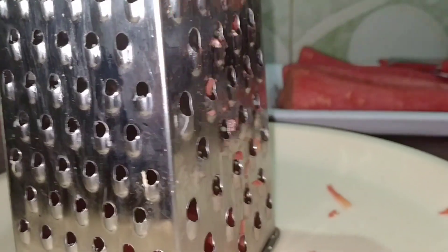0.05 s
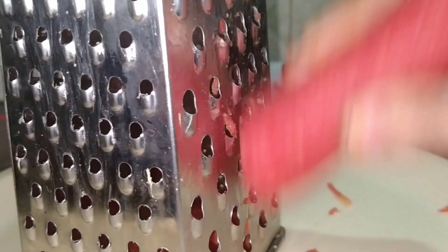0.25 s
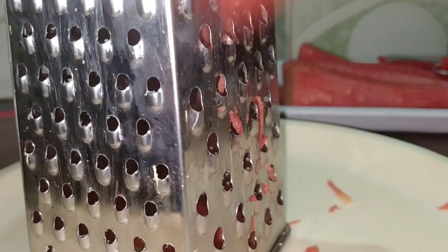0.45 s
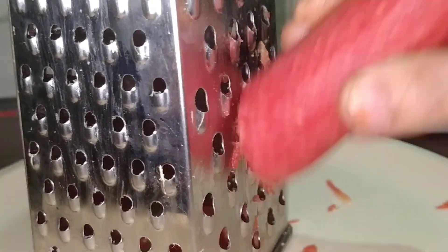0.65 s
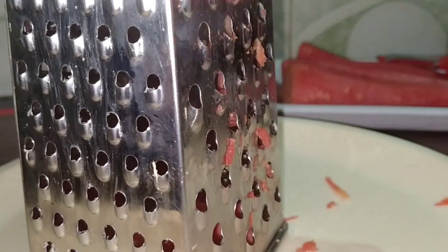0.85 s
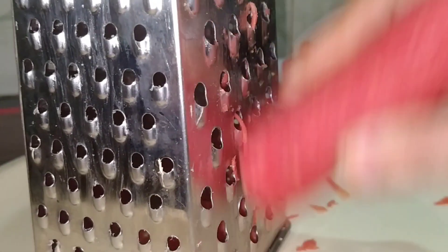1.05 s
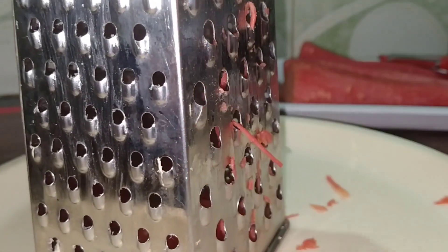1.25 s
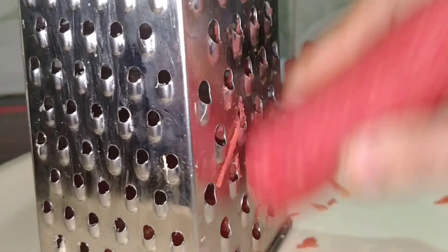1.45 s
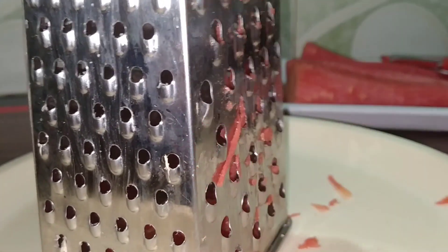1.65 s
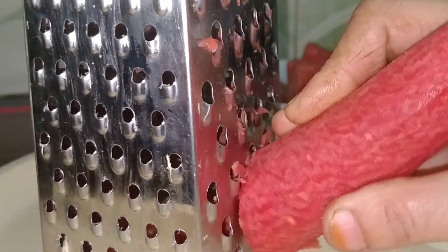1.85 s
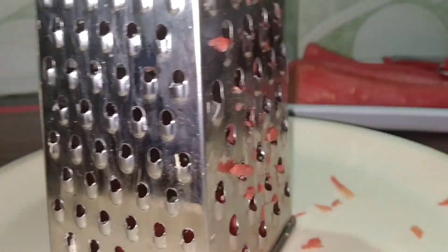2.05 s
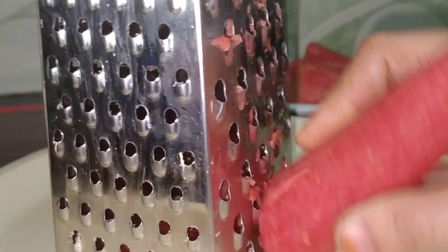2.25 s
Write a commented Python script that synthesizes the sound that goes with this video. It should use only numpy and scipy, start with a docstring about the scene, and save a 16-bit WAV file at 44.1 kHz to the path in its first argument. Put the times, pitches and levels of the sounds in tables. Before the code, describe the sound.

Carrot grated on a metal box grater in six brisk, crunchy strokes, close up in a kitchen

```python
"""A carrot is grated in six even downstrokes on the coarse side of a steel box grater, close by in a kitchen.
First, over faint room tone, it brushes the teeth on its way back up: short swells of scraping noise.
Each stroke lands with a soft knock and a wet hiss, both filtered noise, then swells into a dense crunch:
random fibre snaps, rubbing and catching teeth drive the ringing modes and dense wash of the thin steel.
After some pushes the box thumps on its plate in low decaying sines, once with a longer hum; brushes follow."""
import sys
import numpy as np
from scipy import signal
from scipy.fft import rfft, irfft
from scipy.io import wavfile

SR = 44100
rng = np.random.default_rng(int(sys.argv[2]) if len(sys.argv) > 2 else 0)


def pcm_store(signal):
    """Save signal as 16-bit PCM."""
    levels = np.round(np.clip(np.atleast_2d(signal), -1, 1) * 32767)
    wavfile.write(sys.argv[1], SR, levels.astype(np.int16).T)


N = 101429
T = np.arange(N) / SR

# Room tone colour. Each row: frequency in Hz, relative level in dB.
AIR_COLOUR = [(40, -10.5), (100, 8.5), (300, -8), (700, -9.5), (2000, -14), (5800, -9.5), (7200, -33.5)]
AIR_DB = -72
# Light brushes on the way back up. Each row: start in seconds, length in seconds, level in dB.
BRUSHES = [(0, .08, -54), (0.405, 0.039, -44.5), (0.533, .04, -65), (0.812, 0.051, -66),
           (0.83, 0.04, -57.5), (0.954, .008, -66), (1.249, 0.034, -40.5), (1.638, 0.041, -40.5),
           (1.812, .018, -64.5), (2.104, 0.038, -45)]
BRUSH_FADE_S, CONTACT_RISE_S = 0.01, 0.0028  # the rise also serves the knocks
# A tooth catches and lets go, pinging the steel. Each row: start in seconds, crack level in dB, ping level in dB.
CATCHES = [(0.0249, -38.5, -38.5), (0.297, -21, -21.5), (.311, -30, -27.5), (0.363, -24.5, -33),
           (0.435, -59, -42), (.452, -43.5, -48.5), (.506, -58, -70.5), (0.682, -23.5, -25.5),
           (0.726, -31.5, -31.5), (0.964, -59, -73), (1.079, -30, -24), (1.122, -27.5, -23.5),
           (1.158, -26, -23), (1.25, -42.5, -42), (1.277, -50.5, -42.5), (1.51, -36.5, -22),
           (1.542, -32.5, -22), (1.561, -26, -20), (1.653, -41, -38), (1.959, -30, -22.5),
           (2.114, -47, -37)]
CRACK_FADE_S, PING_RISE_S = 0.0016, 0.0041
PING_LEVEL_SPAN_S = 0.013  # opening span over which a ping's level counts
# Carrot landing on the steel. Each row: start in seconds, rise in seconds, scrape level in dB, wet hiss level in dB.
LANDINGS = [(.193, 0.0055, -43.5, -46), (.586, .012, -51, -37), (0.994, 0.0076, -32.5, -44),
            (1.401, 0.012, -38.5, -50.5), (1.832, 0.005, -29, -40), (2.238, 0.0065, -50, -55.5)]
LAND_HOLD_S, LAND_FADE_S = 0.0068, 0.013
# Downstrokes. Each row: bite in seconds, fastest moment in seconds, end in seconds, level in dB.
STROKES = [(0.239, 0.319, 0.3678, -19.5), (0.607, 0.693, .748, -21.5), (1.03, 1.129, 1.197, -21.5),
           (1.453, 1.53, 1.597, -21.5), (1.873, 1.956, 2.044, -22.5), (2.29, 2.41, 2.44, -22.5)]
EDGE_DROP_DB, SWELL_POWER = 7.5, 1.93  # drop at bite and end, shape of the swell
BITE_S, LIFT_S = 0.012, 0.028  # time constants: digging in before the bite, letting go after the end
# Colour of the crunch. Each row: frequency in Hz, relative level in dB.
CRUNCH_COLOUR = [(55, -29.5), (100, -13.5), (200, -6.5), (350, 2.5), (500, -3), (750, 3), (1000, 2),
                 (1550, 7.5), (2100, 2), (2950, -1), (3800, -1), (4550, 1.5), (5000, -0.5), (5450, 5),
                 (6050, 2.5), (6500, -9.5), (7000, -28.5), (7600, -41)]
FIBRES_PER_S, FIBRE_SPREAD_DB, FIBRE_DB, RUB_DB = 2600, 2, -3, -9
TEETH_PER_S, TEETH_SPREAD_DB = 170, 1.26  # the load flickers as teeth bite
# Modes of the steel box. Each row: frequency in Hz, relative level in dB, T60 in seconds.
STEEL_MODES = [(298, -18, .08), (368, -21, .08), (635, -12, .11), (797, -19, .1), (1012, -17, .1),
               (1168, -18, .09), (1283, -18, .1), (1482, -6, .08), (1545, -10, .06), (1686, 0, .08),
               (1750, -4, .06), (1818, -13, .06), (2048, -19, .07), (2525, -20, .07), (2682, -19, .07),
               (2805, -20, .07), (3266, -17, .07), (3376, -19, .08), (4410, -16, .07), (4657, -12, .07),
               (5416, -16, .06), (5716, -15, .06), (5794, -15, .06)]
RING_DB, WASH_DB, WASH_T60_S = -5.5, -4, 0.04  # listed modes; dense wash of all the others
WASH_SHIFTS_PER_S = 14  # the moving carrot damps ever different parts of the wall
# Dull knocks of flesh on the wall. Each row: start in seconds, level in dB.
KNOCKS = [(0.191, -41), (.568, -54.5), (0.985, -41.5), (1.397, -62.5), (1.831, -40.5), (2.237, -49.5)]
KNOCK_FADE_S = 0.0054
# Colour of a knock. Each row: frequency in Hz, relative level in dB.
FLESH_COLOUR = [(60, -22), (130, -25), (280, 8), (450, -16), (700, -2), (900, -12.5), (1200, -18.5),
                (2600, -28.5), (3550, -20.5), (4400, -40), (7500, -50.5)]
# Hiss bands of the wet face sliding. Each row: centre in Hz, nominal width in Hz, relative level in dB.
SKIN_BANDS = [(3340, 100, -8.5), (5670, 310, 0.5)]
SKIN_FADE_S = 0.037
# The box thumps on its plate. Each row: start in seconds, pitch in Hz, level in dB.
THUMPS = [(0.369, 194, -29.5), (.378, 116, -48), (.405, 136, -42), (.405, 277, -37), (.43, 338, -41),
          (1.19, 188.6, -39.5), (1.205, 105, -47), (1.275, 360, -44), (1.598, 186.7, -37),
          (1.615, 123, -47), (1.645, 145, -42), (1.672, 334.6, -39.5), (1.68, 134, -43)]
THUMP_T60_S, THUMP_RISE_S = 0.12, 0.002
THUMP_ROUGHNESS = 0.45  # share of rattle in the rocking
# The lifted box hums on. Each row: start in seconds, pitch in Hz, level in dB.
HUMS = [(1.285, 298, -49.5)]
HUM_T60_S = 0.28
ROOM_T60_S, ROOM_DB = 0.22, -31
BASS_CUT_HZ, TOP_HZ = 85, 7400


def amp(db):
    """Decibels to gain."""
    return 10 ** (np.asarray(db) / 20)


def unit(x):
    """Scale to rms 1."""
    return x / np.sqrt(np.mean(x ** 2))


def through(x, response):
    """Pass a sound through an impulse response."""
    return signal.fftconvolve(x, response)[:N]


def colour(x, points):
    """Minimum-phase filter through (Hz, dB) points that keeps the power of white noise."""
    points_hz, points_db = np.array(points, float).T
    size = 4096
    bins_hz = np.arange(size // 2 + 1) * SR / size
    gain = unit(amp(np.interp(np.log(bins_hz + 1), np.log(points_hz), points_db)))
    # folding the cepstrum makes the response causal
    cepstrum = irfft(np.log(gain))
    cepstrum[1:size // 2] *= 2
    cepstrum[size // 2 + 1:] = 0
    return through(x, irfft(np.exp(rfft(cepstrum))))


def fade(t60_s):
    """Exponential decay of unit energy."""
    shape = np.exp(-np.log(1000) * T / t60_s)
    return shape / np.linalg.norm(shape)


def burst(start_s, rise_s, hold_s, release_s):
    """Linear attack, hold counted from the start, exponential release by time constant."""
    attack = np.clip((T - start_s) / rise_s, 0, 1)
    return attack * np.exp(-np.maximum(T - start_s - hold_s, 0) / release_s)


def walk(knots_per_s):
    """Random wander in straight lines between knots, rms 1."""
    knots = rng.standard_normal(N // 20)
    return unit(np.interp(T * knots_per_s, np.arange(len(knots)), knots))


def room_tone():
    """Steady coloured noise of the kitchen air."""
    return amp(AIR_DB) * colour(rng.standard_normal(N), AIR_COLOUR)


def effort():
    """How hard the carrot works the teeth: return brushes, landings and downstrokes, summed in power."""
    parts = [amp(db) * burst(start, CONTACT_RISE_S, length, BRUSH_FADE_S) for start, length, db in BRUSHES]
    for start, rise, scrape_db, _ in LANDINGS:
        parts.append(amp(scrape_db) * burst(start, rise, rise + LAND_HOLD_S, LAND_FADE_S))
    for bite, fastest, end, db in STROKES:
        before = (fastest - T) / (fastest - bite)
        after = (T - fastest) / (end - fastest)
        away = np.where(T < fastest, before, after)  # 0 when fastest, 1 at bite and end
        contact = np.exp(-np.maximum(bite - T, 0) / BITE_S - np.maximum(T - end, 0) / LIFT_S)
        parts.append(amp(db - EDGE_DROP_DB * away ** SWELL_POWER) * contact)
    return np.linalg.norm(parts, axis=0)


def grating_force():
    """Randomly timed fibre snaps plus rubbing noise, scaled by effort and the flickering load."""
    snap_now = rng.random(N) < FIBRES_PER_S / SR
    strength_db = FIBRE_SPREAD_DB * np.minimum(rng.exponential(size=N), 3)
    snaps = snap_now * rng.choice([-1, 1], N) * amp(strength_db)
    force = amp(FIBRE_DB) * unit(snaps) + amp(RUB_DB) * rng.standard_normal(N)
    flicker = unit(amp(TEETH_SPREAD_DB * walk(TEETH_PER_S)))
    return force * effort() * flicker


def steel_ring():
    """The box's modes after one tap, unit energy; neighbours swing in opposite directions."""
    ring = np.zeros(N)
    for k, (hz, db, t60_s) in enumerate(STEEL_MODES):
        ring += (-1) ** k * amp(db) * fade(t60_s) * np.sin(2 * np.pi * hz * T)
    return ring / np.linalg.norm(ring)


def tooth_cracks():
    """Short noise cracks as teeth catch."""
    envelope = sum(amp(db) * burst(start, 1 / SR, CRACK_FADE_S, CRACK_FADE_S) for start, db, _ in CATCHES)
    return rng.standard_normal(N) * envelope


def tooth_pings(ring):
    """Each caught tooth lets go over a moment and sets the steel ringing."""
    ping = np.minimum(T / PING_RISE_S, 1) * ring / np.std(ring[T < PING_LEVEL_SPAN_S])
    return sum(amp(db) * np.interp(T - start, T, ping, left=0) for start, _, db in CATCHES)


def wash(x):
    """Dense short ringing of the walls: two noise tails in a wandering blend."""
    turn = np.pi * walk(WASH_SHIFTS_PER_S)
    washed = np.zeros(N)
    for share in (np.cos(turn), np.sin(turn)):
        tail = fade(WASH_T60_S) * rng.standard_normal(N)
        washed += share * through(x, tail)
    return washed


def grating():
    """Snapping fibres, wet rubbing and catching teeth all sound through the steel box."""
    force = grating_force()
    crunch = colour(force + tooth_cracks(), CRUNCH_COLOUR)
    body = (crunch + amp(WASH_DB) * wash(crunch)) / np.hypot(1, amp(WASH_DB))
    ring = steel_ring()
    return body + amp(RING_DB) * through(force, ring) + tooth_pings(ring)


def band(hz, width_hz):
    """Noise through one resonance twice, for steep sides, rms 1."""
    b, a = signal.iirpeak(hz, hz / width_hz / 2, fs=SR)
    once = signal.lfilter(b, a, rng.standard_normal(N))
    return unit(signal.lfilter(b, a, once))


def landings():
    """The soft flesh meets the wall with a dull knock, then its wet face hisses over the steel."""
    push = sum(amp(db) * burst(start, CONTACT_RISE_S, 2 * CONTACT_RISE_S, KNOCK_FADE_S) for start, db in KNOCKS)
    knocks = push * colour(rng.standard_normal(N), FLESH_COLOUR)
    slide = sum(amp(db) * burst(start, rise, rise, SKIN_FADE_S) for start, rise, _, db in LANDINGS)
    hiss = sum(amp(db) * band(hz, width_hz) for hz, width_hz, db in SKIN_BANDS)
    return knocks + slide * hiss


def thumps(events, t60_s):
    """Low decaying notes of the whole box, roughened as it rocks and rattles on the plate."""
    notes = np.zeros(N)
    for start, hz, db in events:
        envelope = burst(start, THUMP_RISE_S, THUMP_RISE_S, t60_s / np.log(1000))
        notes += amp(db) * envelope * np.sin(2 * np.pi * hz * (T - start))
    return notes * (1 + THUMP_ROUGHNESS * walk(TEETH_PER_S))


def kitchen_echo(near):
    """Faint reverberation: a decaying noise tail."""
    return through(near, amp(ROOM_DB) * fade(ROOM_T60_S) * rng.standard_normal(N))


def scene():
    """The grater close up, with a little kitchen echo and room tone."""
    near = grating() + landings() + thumps(THUMPS, THUMP_T60_S) + thumps(HUMS, HUM_T60_S)
    return (near + kitchen_echo(near) + room_tone())[None]


def record(dry):
    """The microphone drops the deep bass and cuts the top."""
    bass_cut = signal.butter(8, BASS_CUT_HZ, "high", fs=SR, output="sos")
    top_cut = signal.ellip(10, 0.2, 80, TOP_HZ, fs=SR, output="sos")  # 0.2 dB ripple, 80 dB stopband
    return signal.sosfilt(top_cut, signal.sosfilt(bass_cut, dry))


dry = scene()
out = record(dry)
pcm_store(out)
```